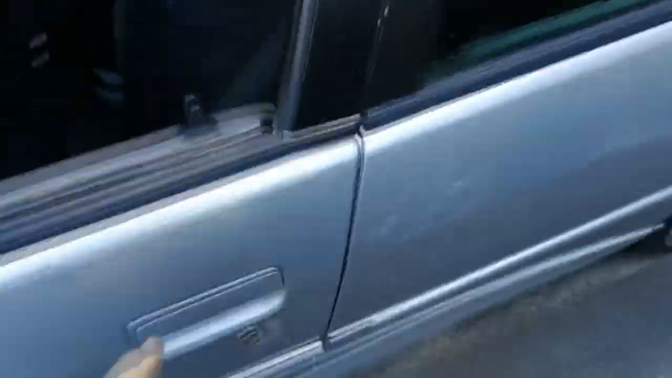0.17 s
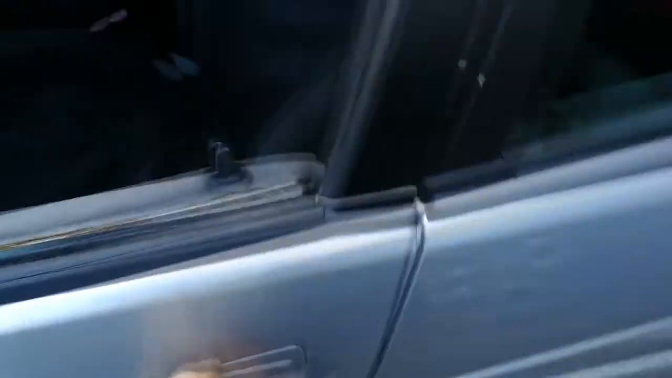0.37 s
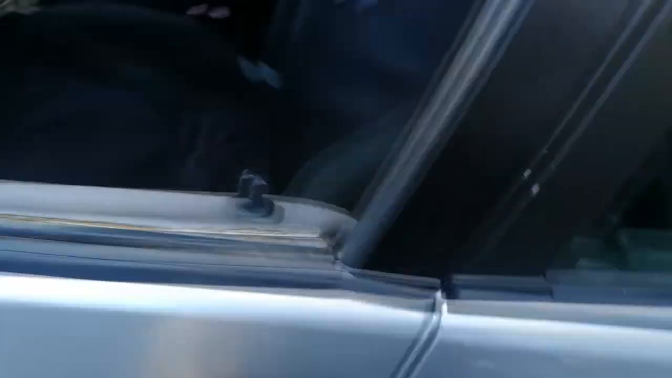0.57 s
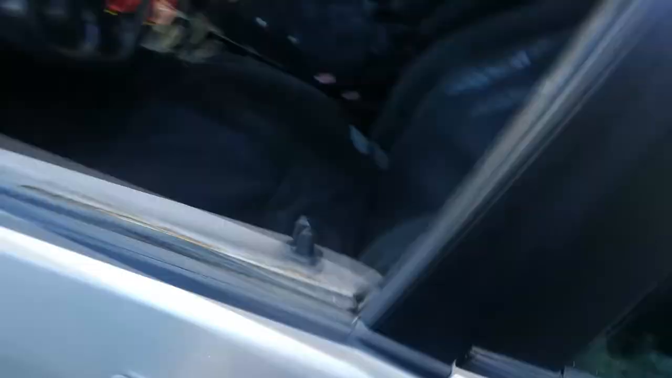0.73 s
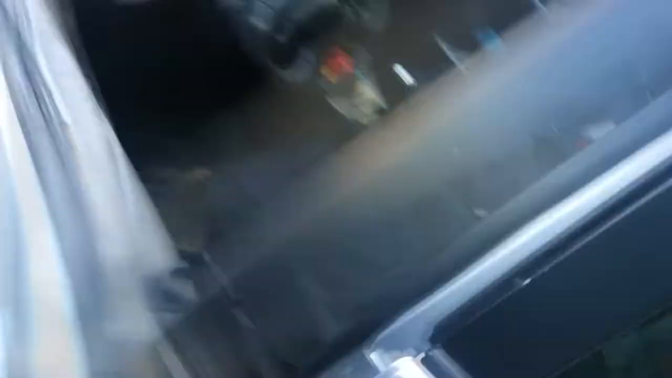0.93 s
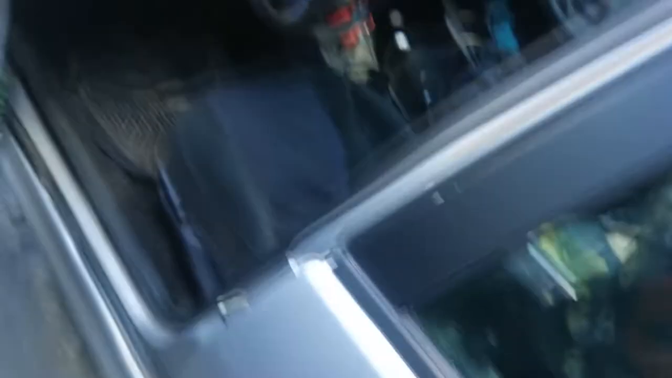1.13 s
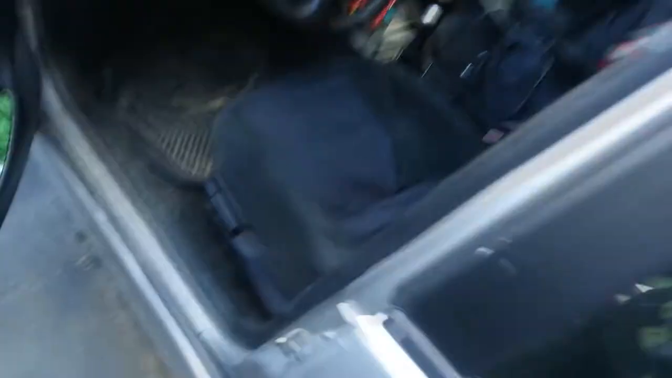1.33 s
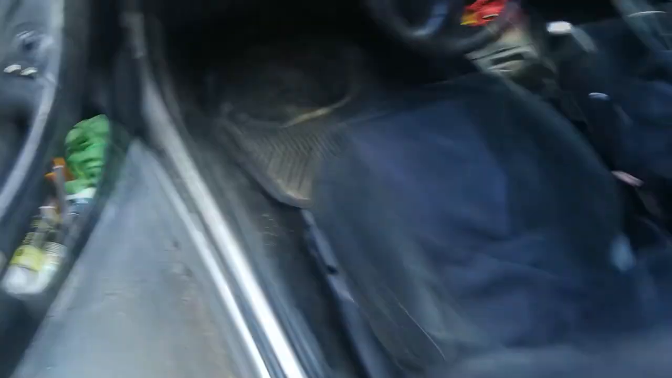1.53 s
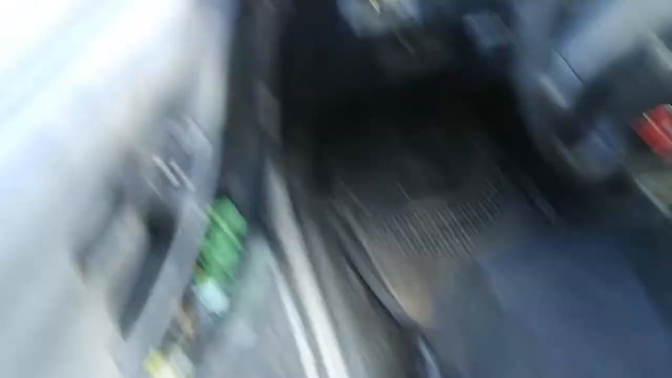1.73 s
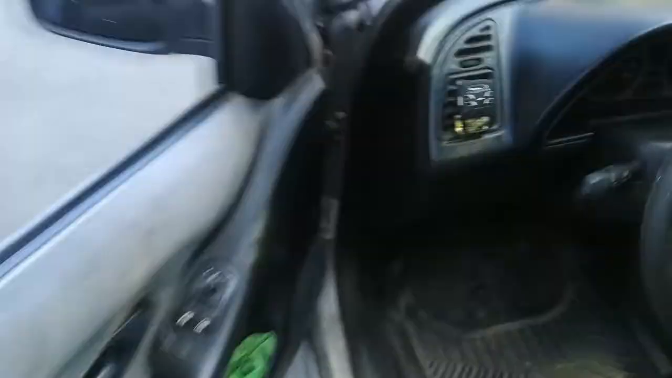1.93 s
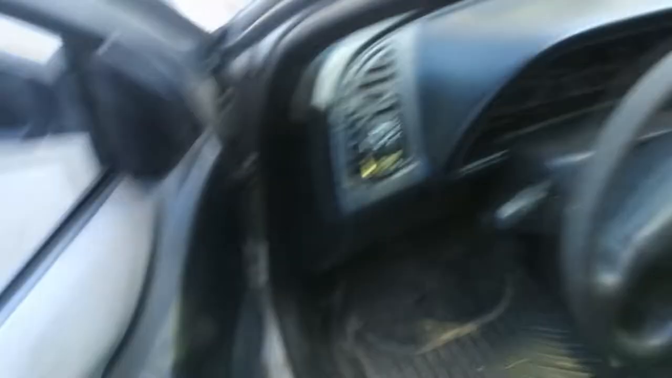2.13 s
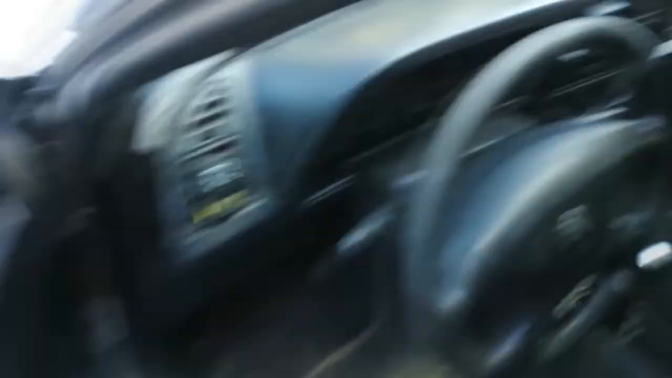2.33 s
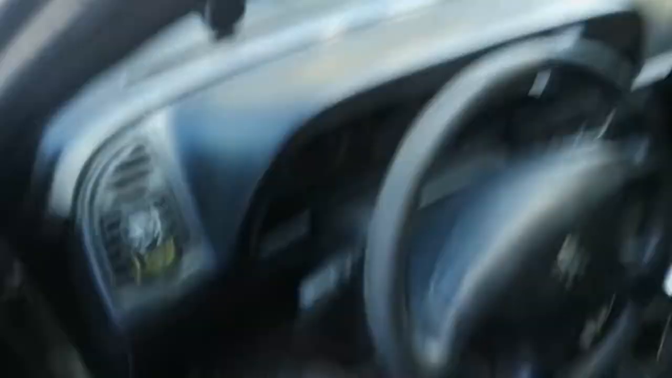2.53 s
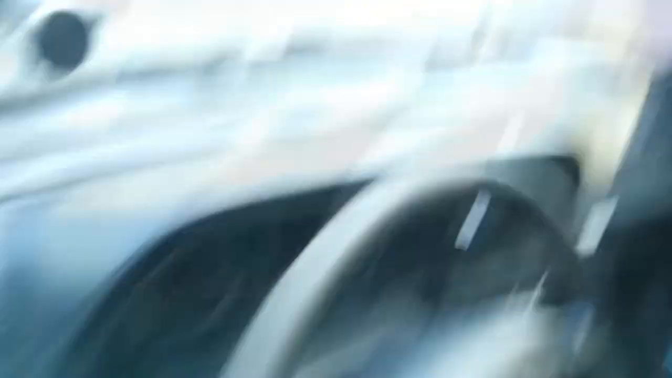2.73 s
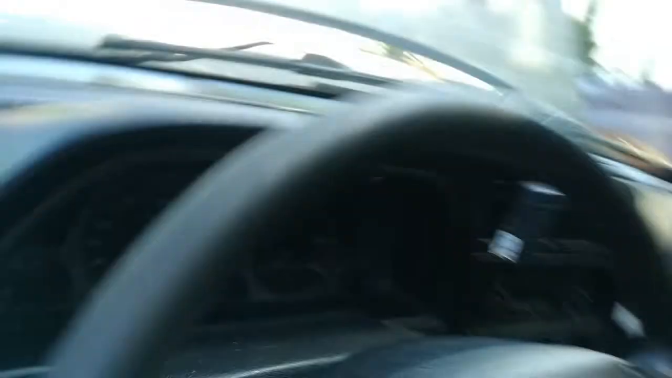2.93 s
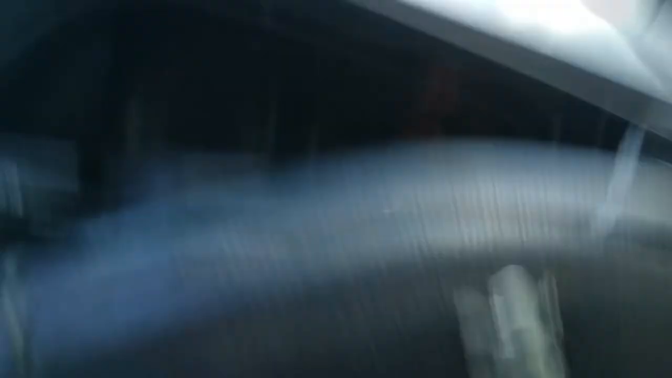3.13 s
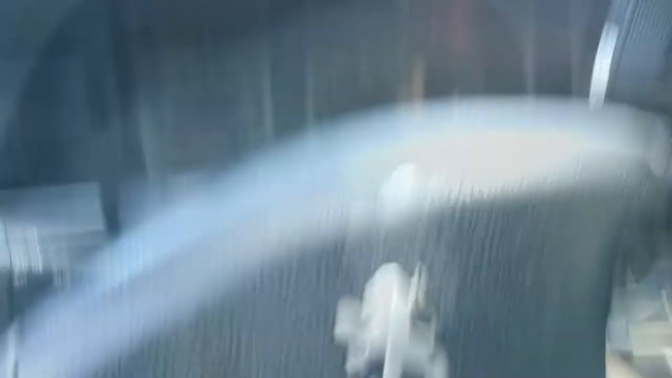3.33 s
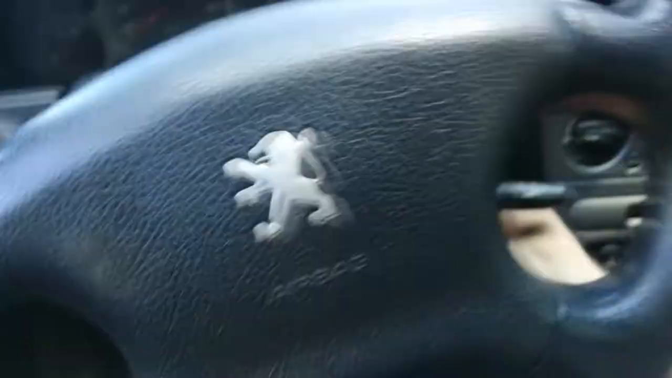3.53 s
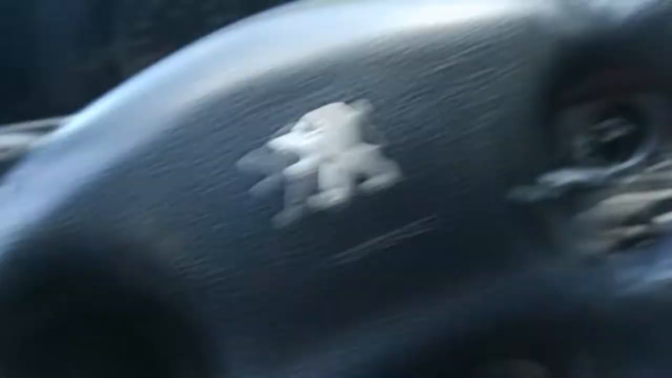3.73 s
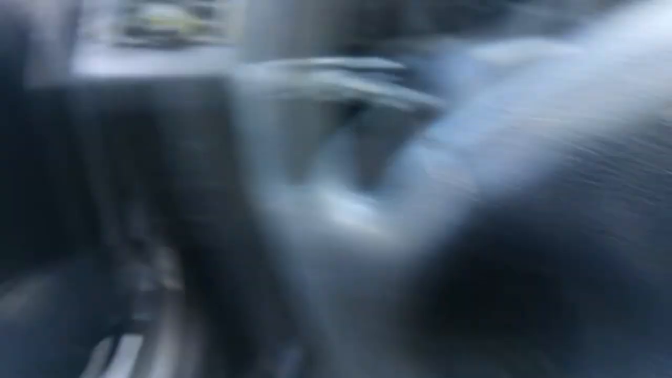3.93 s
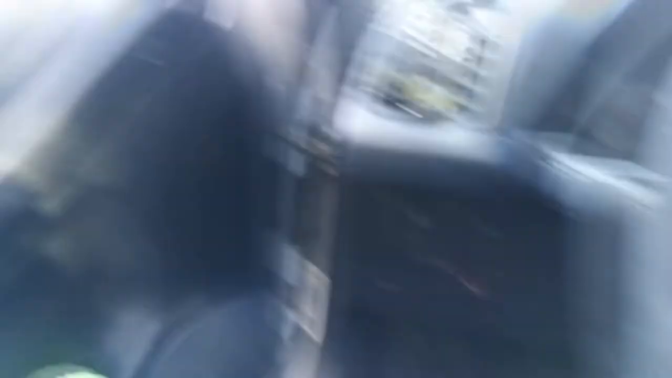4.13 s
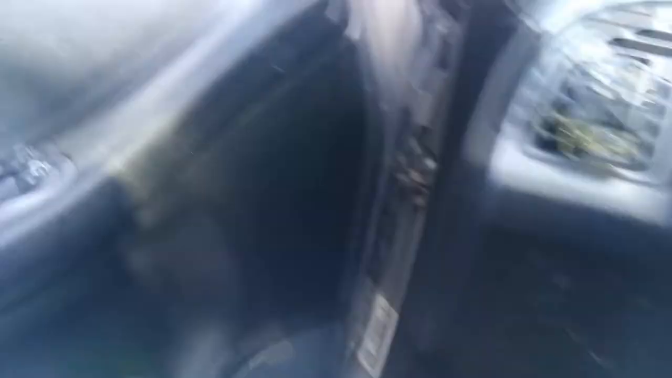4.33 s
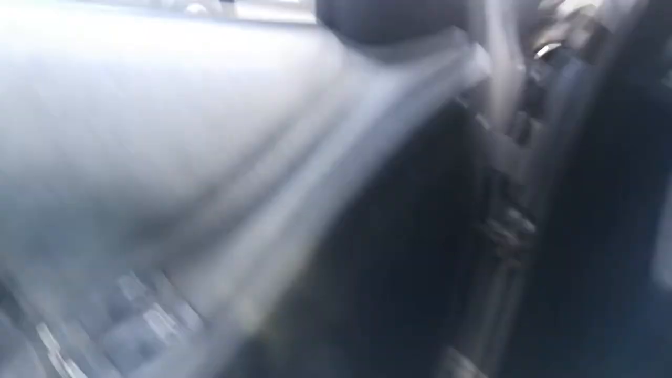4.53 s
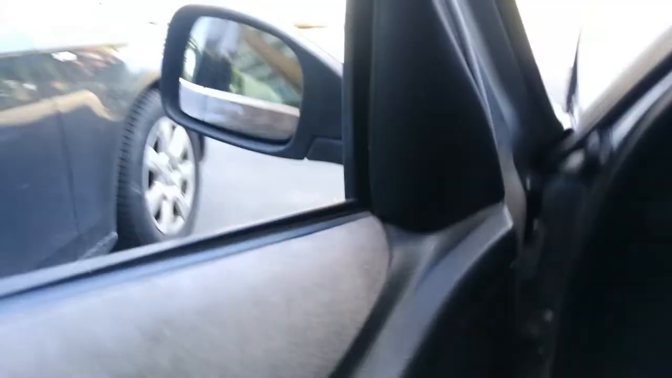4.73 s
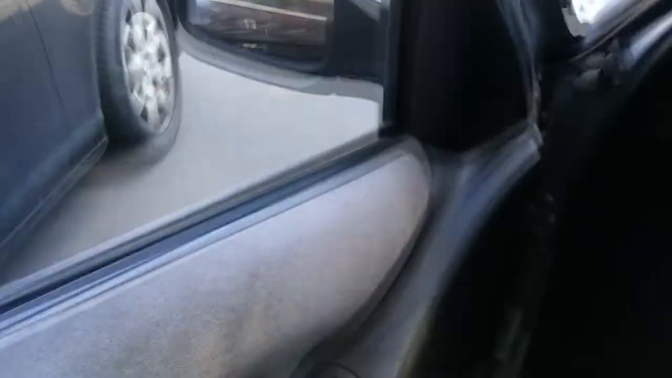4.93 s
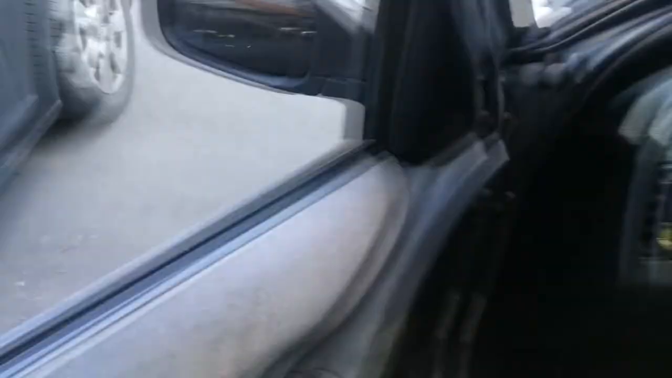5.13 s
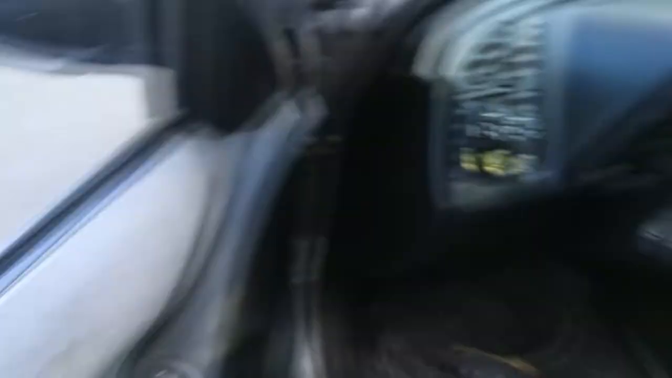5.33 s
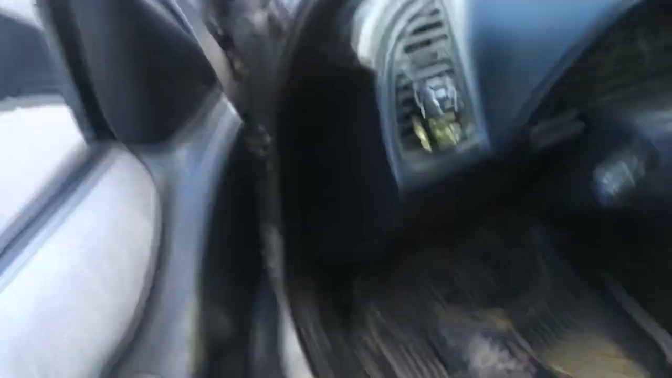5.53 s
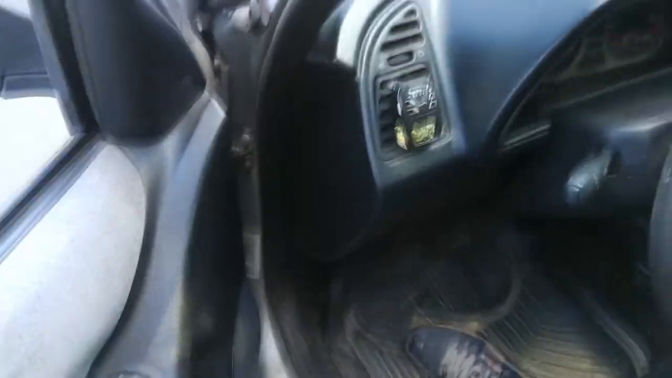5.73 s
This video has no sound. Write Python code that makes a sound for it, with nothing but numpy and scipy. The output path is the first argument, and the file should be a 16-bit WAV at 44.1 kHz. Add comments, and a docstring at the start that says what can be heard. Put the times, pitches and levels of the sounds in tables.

```python
"""Throughout, an engine hums as a harmonic series over faint outdoor noise, while clothes hiss as grainy friction.
After some light trim ticks, a car's door handle knocks and creaks; the latch lets go with a clunk that rings
the door as a sum of decaying modes. Someone then leans into the cabin: fittings click, limbs knock as damped
bands of noise, cloth rustles and the hand-held phone rumbles as it is jostled; late on, the hum briefly throbs.
The phone's left port faces the action; the right one hears it later and duller."""
import sys
import numpy as np
from scipy import signal
from scipy.fft import rfft, irfft
from scipy.io import wavfile
from scipy.ndimage import uniform_filter1d

SR = 44100
rng = np.random.default_rng(int(sys.argv[2]) if len(sys.argv) > 2 else 0)


def persist_wave(psi):
    """Save psi, clipped to +-1, as 16-bit WAV."""
    counts = np.round(np.clip(psi, -1, 1) * 32767).astype(np.int16)
    wavfile.write(sys.argv[1], SR, np.atleast_2d(counts).T)


N = 254898
T = np.arange(N) / SR  # time/s
F = np.maximum(np.fft.rfftfreq(N, 1 / SR), 1)  # frequency/Hz, kept above zero for logarithms

# spectrum of the outdoor noise: [f/Hz, relative level per Hz/dB]
OUTDOOR_SPECTRUM = [(15, -8.5), (35, -6), (75, 1.5), (120, -6.5), (200, -7), (400, -18.5), (1000, -12.5),
                    (2000, -23.5), (4000, -29.5), (9000, -44.5), (11000, -65), (15500, -31)]
# outdoor noise that gets past the car's body: [t/s, level/dB]
OPENNESS = [(0, -49.5), (2.4, -51.5), (3.6, -57.5), (4.1, -56.5), (4.8, -50.5), (5.78, -54.5)]
# nearby engine: [t/s, mean firing rate f/Hz, mean level/dB, overtone level/dB]
ENGINE_COURSE = [(0, 73.27, -50, -3), (.9, 72.5, -48.5, -15.5), (1.5, 75.8, -60.5, -4),
                 (3.7, 68.1, -68, -11), (4.5, 67.8, -54.5, -6.5), (4.7, 71.7, -45, -9),
                 (5.3, 76.9, -46.5, -22), (5.6, 79.05, -41, -19), (5.78, 80.3, -46, -20)]
# hiss of cloth: [f/Hz, relative level per Hz/dB]
CLOTH_SPECTRUM = [(300, 0), (1000, 0), (2000, 6), (4500, 0.5), (8500, 2.5), (11000, -5.5), (15500, -11.5)]
# strokes of clothes over the seat and door frame, and (4.96 s) a long faint hiss from outside: [t/s, length/s,
# level/dB]
CLOTH_STROKES = [(.11, 0.076, -62), (.87, 0.33, -54.5), (1.37, 0.026, -56.5), (1.81, 0.023, -60.5),
                 (2.35, 0.062, -52), (2.48, 0.17, -49.5), (2.555, 0.028, -51), (2.965, 0.062, -47),
                 (3.055, 0.047, -48.5), (3.2, 0.025, -63), (3.39, 0.047, -64.5), (4.215, 0.027, -55),
                 (4.36, 0.27, -56), (4.725, 0.025, -55.5), (4.96, 0.76, -66)]
# rumble of the handled phone: [f/Hz, relative level per Hz/dB]
RUMBLE_SPECTRUM = [(15, 1), (33, 4), (60, -7), (110, -5), (170, -15.5), (300, -22), (600, -32.5),
                   (1200, -30), (3000, -57)]
# jolts of the hand-held phone: [t/s, length/s, level/dB]
PHONE_JOLTS = [(.62, 0.11, -46), (1.45, .9, -58.5), (2.62, 0.41, -46.5), (3.01, 0.13, -36.5),
               (3.22, .05, -42.5), (3.77, 0.088, -52), (4.3, .38, -48), (5.15, 0.75, -56)]
# light ticks of plastic trim, and (2.396 s) a tick that ends a scuff: [t/s, level/dB, centre f/Hz,
# width/octave, T60/s]
TRIM_TICKS = [(.411, -41, 1780, 0.23, 0.044), (0.512, -54, 6370, 0.51, 0.073),
              (0.769, -48.5, 10000, 0.57, 0.056), (.936, -32, 7540, 0.51, 0.038),
              (.968, -47.5, 4900, .7, 0.093), (1.221, -43, 7150, 0.58, 0.038),
              (1.309, -38.5, 5900, 1.6, 0.06), (1.323, -39, 6430, .8, 0.027),
              (1.552, -42.5, 6000, 2.5, 0.013), (1.653, -43.5, 3960, 4.5, 0.041),
              (2.396, -32, 6900, 1.4, 0.038), (2.609, -37.5, 4450, 0.35, 0.064),
              (2.811, -44, 6500, 3.2, 0.083)]
# blows of handle and latch on the door:
# [t/s, ring level/dB, softness cut-off f/Hz, clatter level/dB, share of ring time left by the hand (0-1)]
DOOR_BLOWS = [(.571, -29.5, 640, -42, 0.8), (.584, -29.5, 335, -42, .7), (0.5997, -33, 890, -26, 0.5),
              (0.6044, -46, 1490, -29, 0.7), (0.611, -24.5, 1290, -33, 0.14),
              (0.622, -35, 1000, -32.5, 0.57), (0.631, -34.5, 700, -41, 0.76),
              (0.64, -24.5, 1300, -44, 0.17), (0.661, -35.5, 2500, -46.5, 0.23),
              (.694, -40, 2800, -58, 0.56), (0.877, -30.5, 334, -59.5, 0.6), (1.088, -18.5, 7000, -9.5, 1),
              (1.0947, -36.5, 1500, -20.5, 0.5), (1.127, -33, 1500, -43, 0.77)]
# ringing modes of the undamped door: [f/Hz, level/dB, T60/s]
DOOR_MODES = [(188, -10, .28), (216, -6, .17), (240, 0, .21), (258, 0, .21), (279, -6, .3), (323, -6, .19),
              (350, -7, .11), (419, -4, .22), (485, -13, .22), (565, -13, .1), (674, -1, .18),
              (781, -11, .1), (882, -2, .15), (1087, -9, .11), (1259, -3, .11), (1468, -5, .11),
              (1591, -2, .11), (1807, -5, .12), (2069, -5, .08), (3149, -13, .08), (3805, -7, .08),
              (3914, -6, .12)]
# dense clatter of the lock parts: [f/Hz, relative level per Hz/dB, T60/s]
LOCK_CLATTER = [(80.6, -13, 0.32), (201.7, -3, 0.48), (517, -3, 0.29), (900, 1.5, 0.21), (1516, 8, 0.024),
                (2620, -7, 0.099), (4070, 3, 0.037), (5550, -8, 0.068), (7260, -2, 0.039),
                (11000, -13, 0.029), (15300, -9.5, 0.026)]
# resonances of the handle's linkage: [f/Hz, relative level per Hz/dB]
LINKAGE_SPECTRUM = [(120, -14), (230, 1), (330, -4), (520, -14), (670, -3.5), (900, -10), (1150, -13),
                    (1420, -10.5), (1750, -30), (2100, -13.5), (2350, -44), (6000, -38)]
# sliding contacts: [t/s, length/s, level/dB, centre f/Hz, width/octave]
SLIDING_CONTACTS = [(1.055, 0.009, -46, 5460, .7), (1.069, 0.017, -29.5, 4120, 0.91),
                    (1.0695, 0.0081, -35, 2720, 0.025), (1.071, .016, -35.5, 850, 0.32),
                    (2.364, 0.04, -37, 7200, 0.74), (2.439, 0.023, -43, 7500, 0.77),
                    (4.378, 0.18, -51, 250, 0.3), (4.432, .12, -57.5, 3000, 0.6)]
# dull knocks of limbs on the seat, floor and panels: [t/s, level/dB, centre f/Hz, width/octave]
LIMB_KNOCKS = [(2.587, -33.5, 446, 1.47), (2.866, -38, 149, 0.64), (2.931, -38, 150, 0.57),
               (2.997, -32.5, 336, 0.93), (3.045, -43.5, 475, .4), (3.06, -25, 42, 0.4),
               (3.149, -47, 410, .35), (3.215, -45, 108, 1.88), (3.237, -49, 700, .7),
               (3.358, -50, 834, .5), (4.283, -44, 300, 0.6), (4.337, -42.5, 870, 0.54),
               (4.371, -42, 880, 1.34), (4.413, -44, 694, 1.3), (4.546, -34.5, 210, 0.52),
               (4.546, -42, 780, .8), (4.597, -35, 132, 0.1)]
# clicks of hard fittings:
# [t/s, crack level/dB, crack f/Hz, ring level/dB, ring f/Hz, panel level/dB, panel f/Hz]
FITTING_CLICKS = [(2.637, -32.5, 4630, -32.5, 3490, -36, 1250),
                  (3.739, -44.5, 4450, -44.5, 3180, -50.5, 600),
                  (4.586, -36.5, 3460, -36, 2690, -44.5, 796), (4.609, -39, 3440, -44, 3100, -46.5, 890),
                  (4.9374, -31.5, 5300, -42, 3080, -34.5, 597)]
# loss at the right port for a shade of 1: [f/Hz, level/dB]
PORT_SHADE = [(150, -0.5), (420, 0.3), (700, -16.5), (2400, -7), (4200, -11), (5500, -18), (8000, -19.5),
              (15000, -23)]

# right port's delay, and the frequency above which the ports mostly hear unrelated sound
PORT_LAG_S, SHARED_HZ = .00059, 1150
# time constants of a cloth stroke, and the level between strokes
STROKE_RISE_S, STROKE_FALL_S, CLOTH_REST_DB = 0.05, .018, -69.5
# time constants of a jolt, and the level of the steady hand
JOLT_RISE_S, JOLT_FALL_S, HAND_REST_DB = 0.071, 0.054, -63
# the hum's throb: time of the first dip, dips a second, depth (0-1)
THROB_S, THROB_HZ, THROB_DEPTH = 4.59, 6.03, 1
# steady pull on the linkage: start, length, level, time constant of both edges
PULL_S, PULL_LENGTH_S, PULL_DB, PULL_EDGE_S = .86, 0.148, -41.5, 0.0095
# ring time at the reference pitch; deeper knocks last longer by this power
KNOCK_T60_S, KNOCK_REF_HZ, KNOCK_LAW = 0.1, 497, 0.38
RING_OCTAVES = .07  # width of a fitting's ringing note
TOP_HZ = 15900  # upper limit of the phone's band


def undb(db):
    """Level: the decibel is the logarithm of a gain, inverted here."""
    return 10 ** (np.asarray(db) / 20)


def curve(table, axis=1):
    """Interpolation in time: one table column at every sample."""
    rows = np.array(table)
    return np.interp(T, rows[:, 0], rows[:, axis])


def across(table, hz, axis=1):
    """Interpolation in log frequency: one table column at the given pitches."""
    rows = np.array(table)
    return np.interp(np.log(hz), np.log(rows[:, 0]), rows[:, axis])


def unit(x):
    """Normalization of mean power: scale to rms 1."""
    return x / np.sqrt(np.mean(x ** 2))


def colour(x, spectrum):
    """Linear filtering: weight the spectrum of a full-length sound, at rms 1."""
    return unit(irfft(rfft(x) * undb(across(spectrum, F)), N))


def band(x, hz, octaves):
    """Band-pass filtering: a Gaussian bell in log frequency, at rms 1."""
    size = x.shape[-1]
    f = np.maximum(np.fft.rfftfreq(size, 1 / SR), 1)
    bell = np.exp(-.5 * (np.log2(f / hz) / octaves) ** 2)
    return unit(irfft(rfft(x) * bell, size))


def walk(rate):
    """Slow random fluctuation: smoothed chance values at this rate/Hz, at rms near 1."""
    k = max(int(SR / rate), 1)
    steps = np.repeat(rng.standard_normal(N // k + 2), k)
    return unit(uniform_filter1d(steps, k)[:N])


def grains(size, spread_db):
    """Granular friction: two unrelated noises share grain levels scattered exponentially in dB."""
    strength = undb(spread_db * rng.exponential(size=size // 32 + 1))
    return rng.standard_normal((2, size)) * np.repeat(strength, 32)[:size]


def add(out, s, x):
    """Superposition: mix a sound in at time s."""
    i = int(s * SR)
    out[:, i:i + x.shape[-1]] += x[:, :N - i]


def ports(pair, shade=1):
    """Delay, coherence and shadow: the right port hears shared lows and unrelated highs, late and shaded."""
    size = pair.shape[-1]
    f = np.maximum(np.fft.rfftfreq(size, 1 / SR), 1)
    near, far = rfft(pair)
    shared = 1 / (1 + (f / SHARED_HZ) ** 4)  # share of power
    mixed = np.sqrt(shared) * near + np.sqrt(1 - shared) * far
    late = mixed * np.exp(-2j * np.pi * f * PORT_LAG_S)
    right = irfft(late * undb(shade * across(PORT_SHADE, f)), size)
    return np.array([pair[0], right])


def fade(t, t60):
    """Free decay: damping lowers the level by 60 dB in each T60."""
    return undb(-60 * t / t60)


def swell(t, hz, cycles=0.66):
    """Inertia: a panel needs about a cycle to get moving, so the lows come later."""
    return 1 - np.exp(-t * hz / cycles)


def gestures(rows, rise_s, fall_s, rest_db):
    """Addition of powers: movements swell, hold and die away exponentially over a resting level."""
    power = undb(rest_db) ** 2
    for s, length, db in rows:
        before = np.maximum(s - T, 0) / rise_s
        after = np.maximum(T - s - length, 0) / fall_s
        power = power + (undb(db) * np.exp(-before - after)) ** 2
    return np.sqrt(power)


def tap(hz, octaves, t60, tail_db=-24, tail_t60=0.36):
    """Damped dense modes: a contact's band of noise dies away, with a trace of the cabin."""
    t = T[:SR // 3]
    decay = fade(t, t60) + undb(tail_db) * fade(t, tail_t60)
    return swell(t, hz) * decay * band(rng.standard_normal((2, len(t))), hz, octaves)


def outdoors(hiss_db=-72.5):
    """Transmission loss: distant traffic noise varies with the car's openness, over steady microphone hiss."""
    level = undb(curve(OPENNESS) + 0.41 * walk(4.5))
    air = colour(rng.standard_normal((2, N)), OUTDOOR_SPECTRUM) * level
    hiss = undb(hiss_db) * rng.standard_normal((2, N))
    return ports(air, shade=0.45) + hiss


def engine(wander=0.0061, slope_db=-8):
    """Harmonic series: a muffled exhaust note and three overtones waver in speed and strength."""
    firing_hz = curve(ENGINE_COURSE) * (1 + wander * walk(8.4))
    phase = 2 * np.pi * np.cumsum(firing_hz) / SR
    overtones = 0
    for k in range(2, 5):
        gain = undb(slope_db * (k - 2) + 1.7 * walk(14))
        overtones = overtones + gain * np.sin(k * phase)
    hum = np.sqrt(2) * (np.sin(phase) + undb(curve(ENGINE_COURSE, axis=3)) * overtones)
    hum = hum * undb(curve(ENGINE_COURSE, axis=2) + walk(16)) * throb()
    return ports(np.array([hum, hum]), shade=0.15)


def throb(count=5):
    """Amplitude modulation: the gain dips a few times at an even rate and is 1 before and after."""
    beats = np.clip((T - THROB_S) * THROB_HZ, -.5, count - .5)
    return 1 - THROB_DEPTH * np.cos(np.pi * beats) ** 2


def movement(stroke_db=2.5, grain_db=1.0):
    """Friction and handling noise: cloth hisses in uneven strokes while the jostled phone rumbles."""
    unevenness = undb(stroke_db * walk(45) + grain_db * walk(350))
    strokes = gestures(CLOTH_STROKES, STROKE_RISE_S, STROKE_FALL_S, CLOTH_REST_DB)
    cloth = colour(grains(N, spread_db=1.0), CLOTH_SPECTRUM) * strokes * unevenness
    jolts = gestures(PHONE_JOLTS, JOLT_RISE_S, JOLT_FALL_S, HAND_REST_DB)
    rumble = colour(rng.standard_normal((2, N)), RUMBLE_SPECTRUM) * jolts * undb(1.8 * walk(6.4))
    return ports(cloth, shade=0.9) + ports(rumble, shade=0.86)


def ticks(faint_db=-55, faint_hz=7500, count=10):
    """Light impact: touched trim ticks as damped bands; fainter ticks, at most faint_db, fall at random."""
    out = np.zeros((2, N))
    for s, db, hz, octaves, t60 in TRIM_TICKS:
        add(out, s, undb(db) * tap(hz, octaves, t60))
    for place, strength in rng.uniform(size=(count, 2)):
        add(out, place * T[-1], undb(faint_db) * strength * tap(faint_hz, octaves=.7, t60=.03))
    return ports(out)


def door():
    """Modal superposition: blows ring the same panel modes; soft contacts spare the highs, a hand damps all."""
    out, t = np.zeros((2, N)), T[:SR // 2]
    for s, ring_db, soft_hz, clatter_db, free in DOOR_BLOWS:
        # each blow lands at another spot, so the modes start in other phases
        phases = rng.uniform(0, 2 * np.pi, len(DOOR_MODES))
        ring = 0
        for phase, (hz, db, t60) in zip(phases, DOOR_MODES):
            reach = undb(db) / (1 + (hz / soft_hz) ** 4)
            mode = np.sin(2 * np.pi * hz * t + phase)
            ring = ring + reach * mode * swell(t, hz) * fade(t, t60 * free)
        add(out, s, undb(ring_db) * ring + undb(clatter_db) * clatter(t))
    return ports(out)


def clatter(t, tail_db=-29, tail_t60=0.41):
    """High modal density: lock noise decays band by band, mostly faster in the treble, with a cabin tail."""
    centres = 80 * 2 ** np.arange(0, 8, .5)  # half-octave steps
    gains = undb(across(LOCK_CLATTER, centres)) * np.sqrt(centres)  # level per Hz to level per band
    out = 0
    for hz, gain in zip(centres, gains / np.linalg.norm(gains)):
        t60 = across(LOCK_CLATTER, hz, axis=2)
        decay = fade(t, t60) + undb(tail_db) * fade(t, tail_t60)
        noise = band(rng.standard_normal((2, len(t))), hz, 1 / 4)
        out = out + gain * swell(t, hz) * decay * noise
    return out


def creak(slip_hz=235, grit_db=-2):
    """Stick-slip: uneven slips, with grit between them, excite the linkage under a steady pull."""
    turns = np.cumsum(slip_hz * (1 + .07 * walk(90))) / SR
    # one pulse for each whole turn, less the mean
    slips = unit(np.diff(np.floor(turns), prepend=0) - slip_hz / SR)
    rub = slips + undb(grit_db) * rng.standard_normal((2, N))
    pull = gestures([(PULL_S, PULL_LENGTH_S, PULL_DB)], PULL_EDGE_S, PULL_EDGE_S, -np.inf)
    return ports(colour(rub, LINKAGE_SPECTRUM) * pull * undb(2 * walk(70)), shade=0.75)


def scrapes(release_t60=0.0074, spread_db=-3.7):
    """Sliding friction: parts under load give dense slips that start at once and ring off briefly."""
    out, t = np.zeros((2, N)), T[:SR // 4]
    for s, length, db, hz, octaves in SLIDING_CONTACTS:
        onset = np.minimum(t / 0.00077, 1)
        contact = onset * fade(np.maximum(t - length, 0), release_t60)
        add(out, s, undb(db) * contact * band(grains(len(t), spread_db), hz, octaves))
    return ports(out, shade=5.5)


def knocks():
    """Frequency-dependent damping: soft bumps, where the deeper knock rings longer."""
    out = np.zeros((2, N))
    for s, db, hz, octaves in LIMB_KNOCKS:
        t60 = KNOCK_T60_S * (KNOCK_REF_HZ / hz) ** KNOCK_LAW
        add(out, s, undb(db) * tap(hz, octaves, t60))
    return ports(out, shade=0.92)


def clicks():
    """Impact excitation: a hard fitting cracks, rings on one note and shakes the panel that holds it."""
    cracks, rings = np.zeros((2, N)), np.zeros((2, N))
    for s, crack_db, crack_hz, ring_db, ring_hz, panel_db, panel_hz in FITTING_CLICKS:
        crack = tap(crack_hz, octaves=0.97, t60=0.041, tail_db=-23, tail_t60=0.39)
        ring = tap(ring_hz, RING_OCTAVES, t60=0.057, tail_db=-30, tail_t60=.15)
        panel = tap(panel_hz, octaves=0.93, t60=0.094)
        add(cracks, s, undb(crack_db) * crack)
        add(rings, s, undb(ring_db) * ring + undb(panel_db) * panel)
    return ports(cracks, shade=0.73) + ports(rings, shade=0.41)


def scene():
    """Superposition: the sounds of all sources add at the two ports."""
    background = outdoors() + engine() + movement()
    opening = ticks() + door() + creak() + scrapes()
    return background + opening + knocks() + clicks()


def record(dry, roll_off_hz=12000):
    """Band limiting and saturation: microphones lose top treble; the phone rounds peaks and cuts the top."""
    roll_off = signal.butter(2, roll_off_hz, fs=SR, output="sos")
    top_cut = signal.ellip(10, .2, 80, TOP_HZ, fs=SR, output="sos")
    heard = signal.sosfilt(roll_off, dry)
    return signal.sosfilt(top_cut, np.tanh(heard))


dry = scene()
out = record(dry)
persist_wave(out)
```